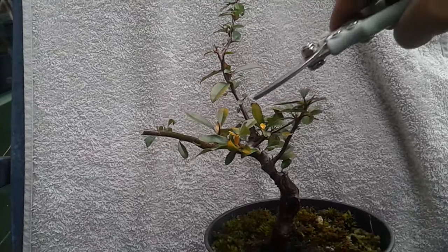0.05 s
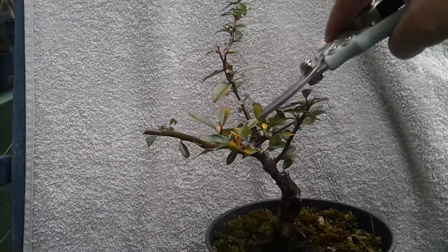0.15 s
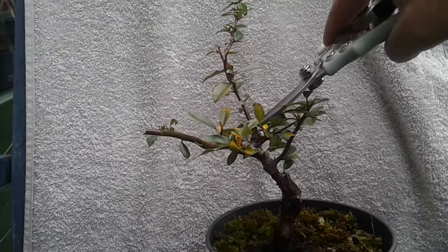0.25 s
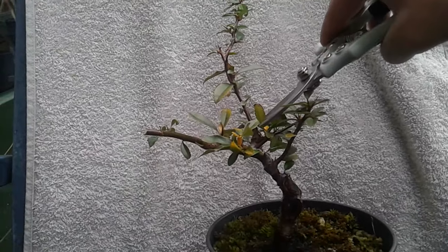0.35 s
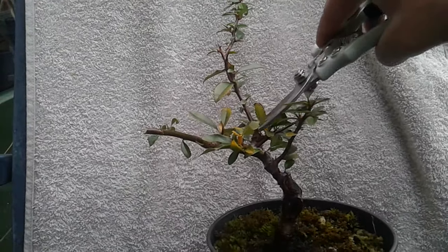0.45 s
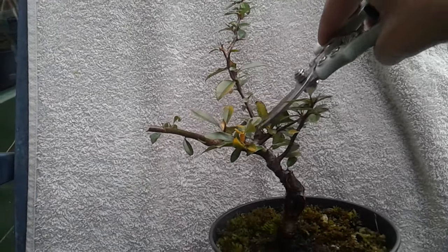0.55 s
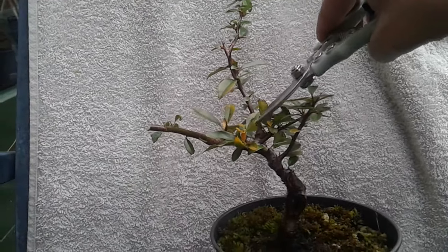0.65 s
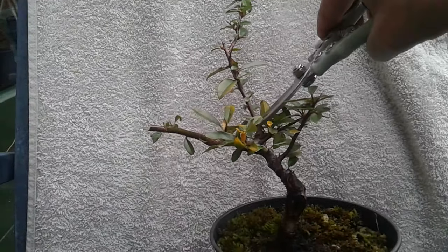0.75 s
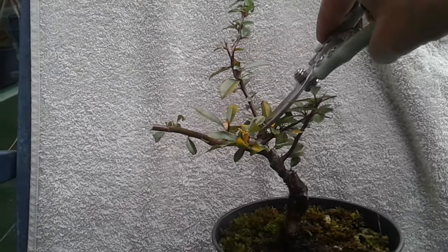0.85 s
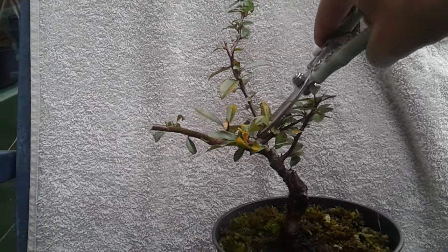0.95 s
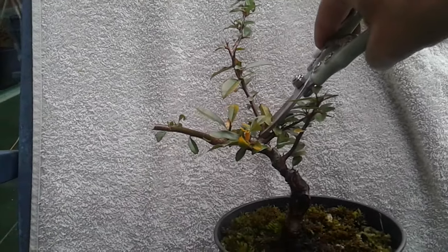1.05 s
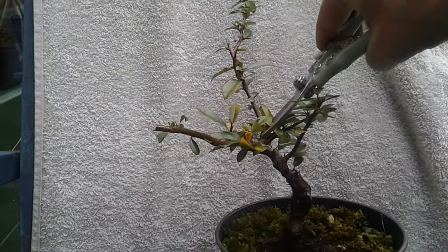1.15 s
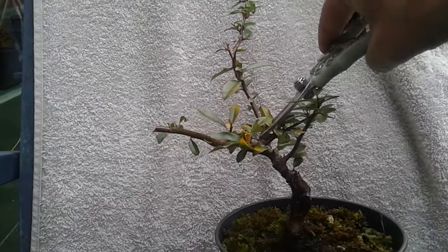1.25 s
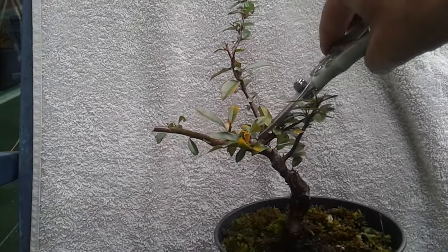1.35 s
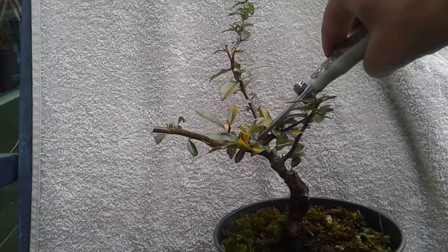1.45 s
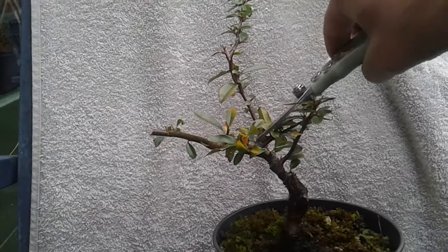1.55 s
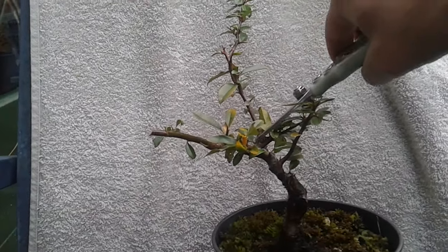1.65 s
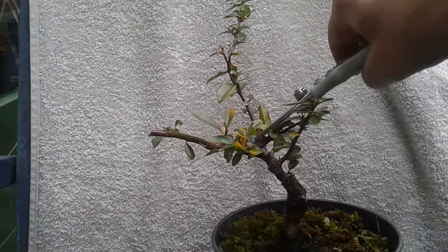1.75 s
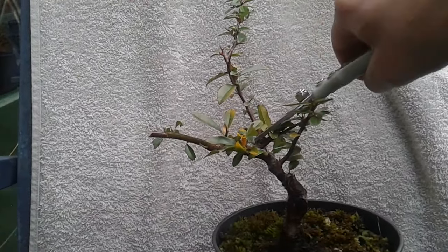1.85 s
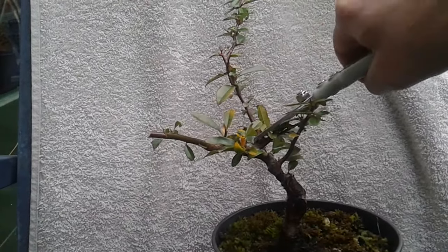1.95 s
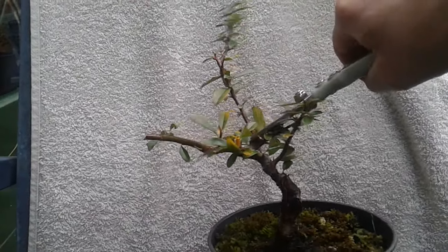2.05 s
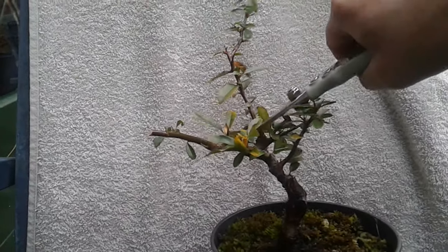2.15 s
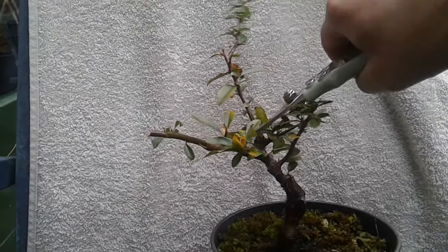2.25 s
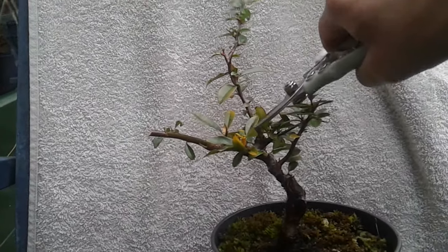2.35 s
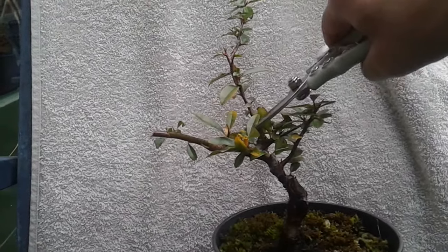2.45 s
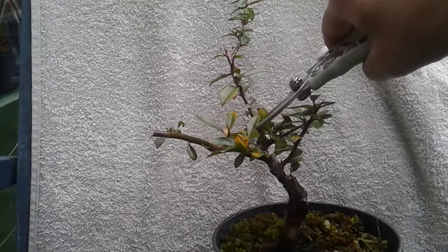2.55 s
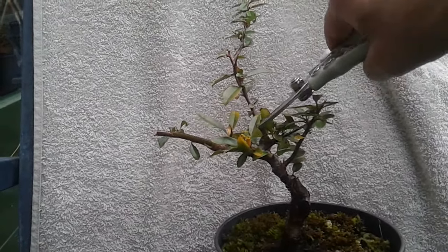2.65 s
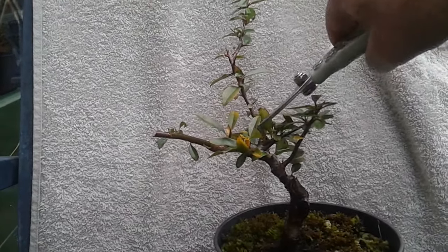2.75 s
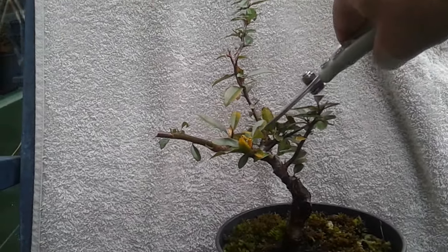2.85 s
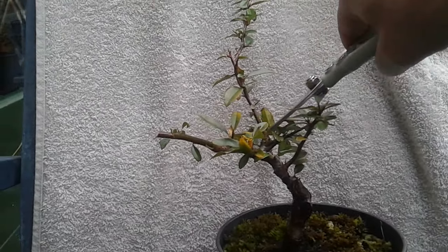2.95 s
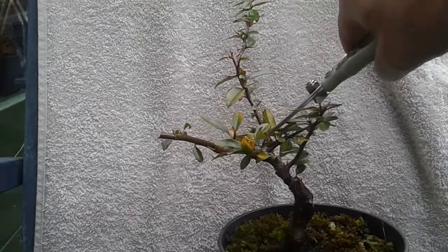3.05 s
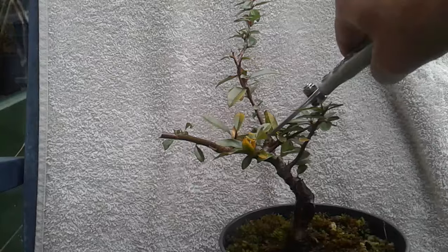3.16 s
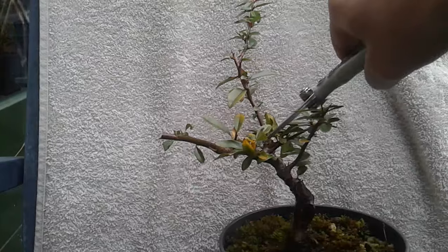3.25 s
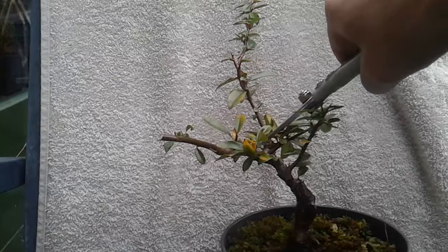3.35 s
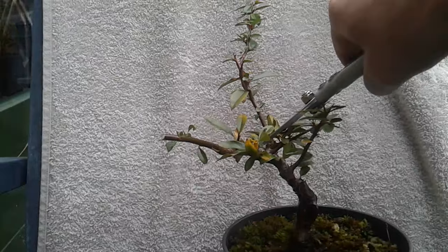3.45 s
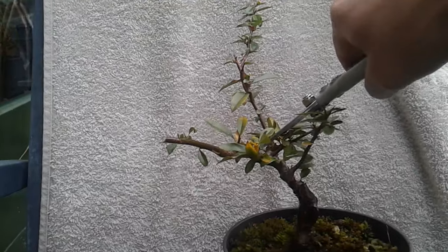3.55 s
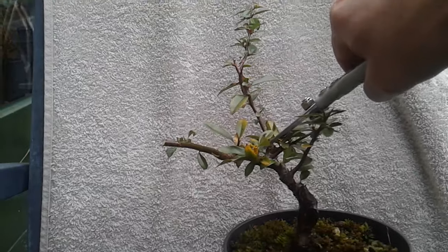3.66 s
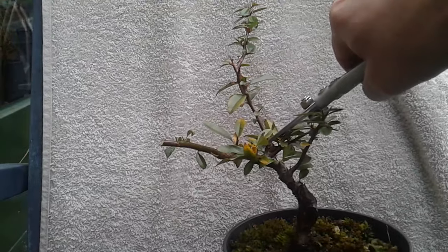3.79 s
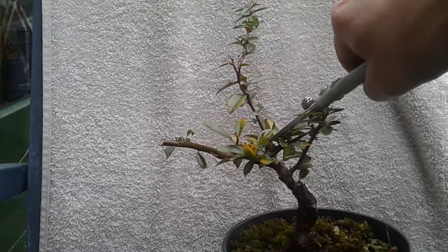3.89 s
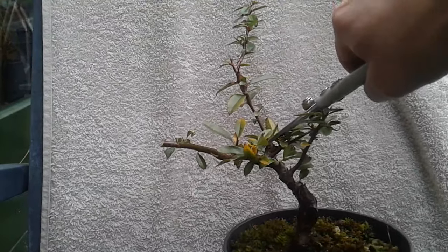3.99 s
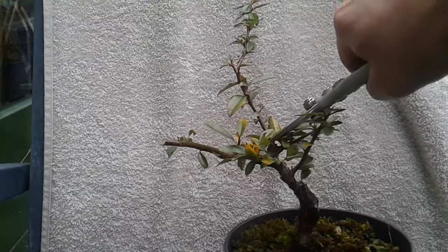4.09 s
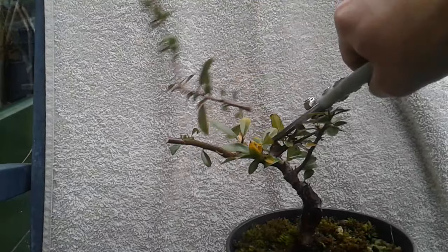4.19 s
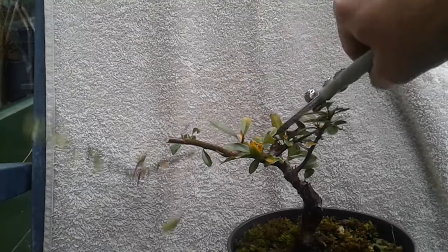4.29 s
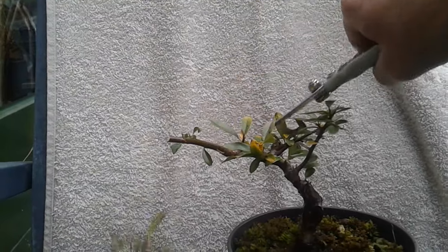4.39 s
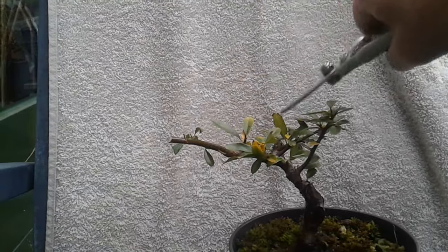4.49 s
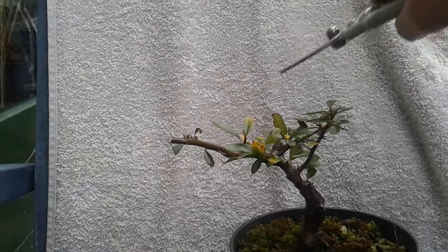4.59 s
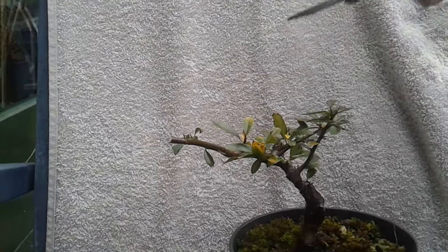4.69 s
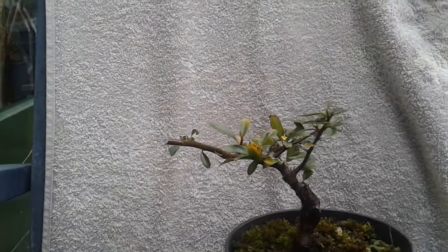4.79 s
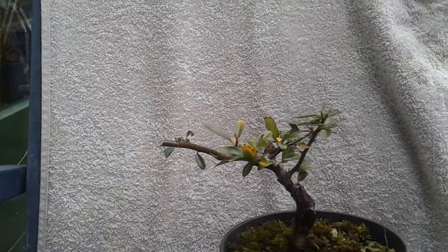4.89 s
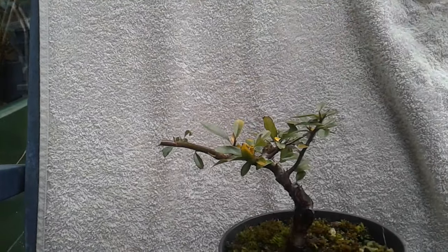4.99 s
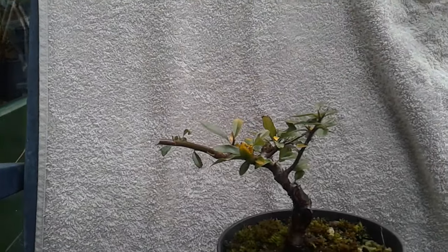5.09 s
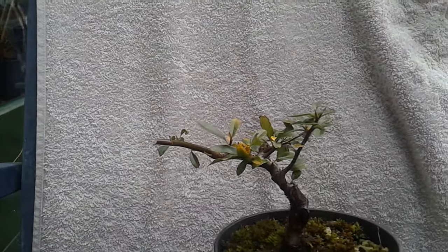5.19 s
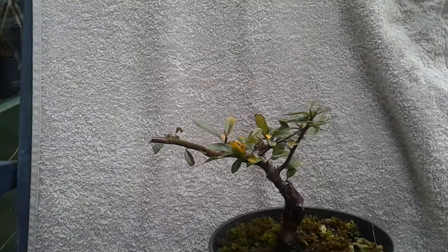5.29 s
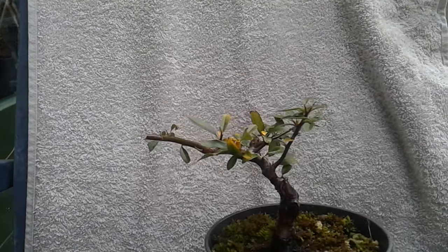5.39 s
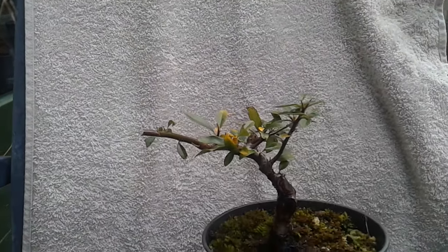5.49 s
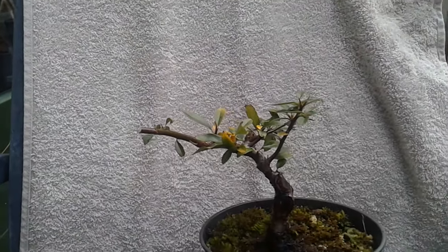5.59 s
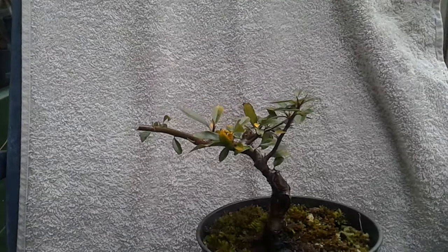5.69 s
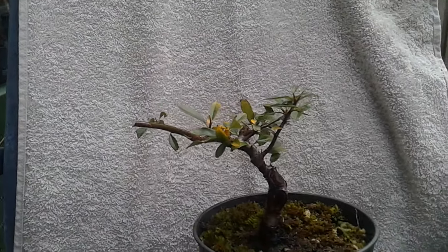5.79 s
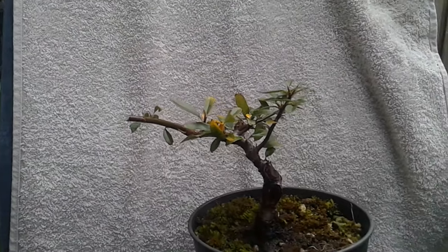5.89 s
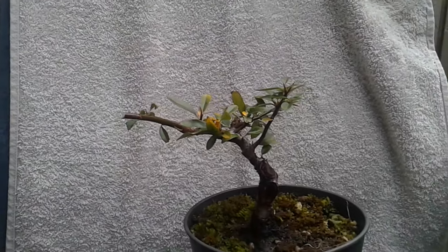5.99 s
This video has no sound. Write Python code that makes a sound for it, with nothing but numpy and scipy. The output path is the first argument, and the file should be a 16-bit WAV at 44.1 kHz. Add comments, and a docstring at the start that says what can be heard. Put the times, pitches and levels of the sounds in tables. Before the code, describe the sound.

Small pruning shears work through the leaves of a potted shrub, close to the microphone. From the start to about 1 second, steel rubs over leaves and twigs in short, scratchy strokes with several crisp, dry clicks. The rustling turns softer and sparser until about 2 seconds, with light ticks. It picks up again in uneven strokes, with a faint knock through the trunk and pot near 2.2 seconds and brighter clicks around 3.1 and 3.8 seconds. At about 4.1 seconds the blades snap shut through a shoot in one sharp metallic snip. The shoot brushes down through the leaves with a few clicks, the blades tick faintly near 4.5 seconds, and it lands softly around 4.6 seconds. A faint low outdoor rumble, a distant wash and a thin hiss lie beneath throughout, and carry on alone until about 6 seconds.

```python
"""Short rubbing strokes of pruning shears in the leaves of a potted shrub, close to a small microphone.
Steel slips over leaf and twig; leaf edges and thorns flick free with dry clicks. Then the blades snap
shut through a shoot, which brushes down and lands. Jolts ring the trunk and pot.
A low outdoor rumble, a distant wash and the recorder's hiss lie beneath."""
import sys
import numpy as np
from scipy import signal
from scipy.io import wavfile
from scipy.ndimage import uniform_filter1d

SR = 44100
rng = np.random.default_rng(int(sys.argv[2]) if len(sys.argv) > 2 else 0)


def inscribe(sig):
    """Save sig as 16-bit PCM at rate SR to the path in sys.argv[1].

    A 1-D sig is mono; a 2-D sig holds one channel per row.
    Samples are clipped to [-1, 1] before scaling.
    """
    pcm = np.round(np.clip(np.atleast_2d(sig).T, -1, 1) * 32767)
    wavfile.write(sys.argv[1], SR, pcm.astype(np.int16))


N = 266136

# Steel on leaves. Each row: peak time, rise and fall in seconds, peak in dB, treble over body in dB.
LEAF_STROKES = [(0.075, 0.063, 0.052, -66, 4), (0.164, 0.063, 0.22, -37.5, 0),
                (0.231, 0.071, 0.069, -36.5, 6.5), (0.324, 0.057, 0.045, -33.5, 3.5),
                (0.387, 0.21, 0.12, -34, 0.5), (0.502, 0.076, 0.035, -40, -2),
                (0.59, 0.048, 0.043, -38.5, 2.5), (0.697, 0.03, 0.054, -37.5, 0),
                (0.747, 0.11, 0.052, -36, 1), (0.871, 0.066, 0.086, -40.7, 1.2),
                (0.912, 0.05, 0.037, -39.5, 0.5), (0.987, 0.027, 0.049, -57, 2),
                (1.026, 0.039, 0.068, -65.5, 14), (1.082, 0.033, 0.073, -52, 1.3),
                (1.14, 0.016, 0.11, -62.5, 12), (1.171, 0.013, 0.026, -58.5, -8),
                (1.23, 0.296, 0.12, -72, 3), (1.382, 0.033, 0.043, -62, -7), (1.5, 0.078, 0.059, -49.5, 0),
                (1.536, 0.019, 0.05, -41, -2), (1.664, 0.061, 0.051, -45.5, -1),
                (1.725, 0.028, 0.051, -49.8, -3.5), (1.879, 0.082, 0.065, -45.5, -1),
                (1.93, 0.04, 0.063, -59.5, 2), (1.986, 0.03, 0.064, -62, -1),
                (2.099, 0.061, 0.043, -47.5, 4.5), (2.12, 0.023, 0.014, -43, 15),
                (2.175, 0.045, 0.014, -43, 1.5), (2.233, 0.056, 0.021, -44.5, -1),
                (2.293, 0.061, 0.032, -44.5, 0.5), (2.359, 0.028, 0.07, -39, 11),
                (2.39, 0.038, 0.055, -37, 1), (2.483, 0.12, 0.037, -41.5, 0.6),
                (2.532, 0.028, 0.055, -38.5, 2), (2.652, 0.049, 0.032, -48.5, 1),
                (2.743, 0.056, 0.23, -46.5, 0.5), (2.786, 0.037, 0.065, -42, 4),
                (2.823, 0.031, 0.034, -32.5, 8.5), (2.874, 0.106, 0.052, -44, -2.3),
                (2.943, 0.028, 0.062, -42.5, -0.5), (3.01, 0.034, 0.047, -34, 1.3),
                (3.043, 0.014, 0.038, -37.5, 2.1), (3.127, 0.018, 0.029, -44.8, 3),
                (3.195, 0.05, 0.032, -45.7, 4.5), (3.255, 0.043, 0.049, -38.5, 4.5),
                (3.314, 0.252, 0.061, -50.5, 1), (3.426, 0.045, 0.051, -50, 2.5),
                (3.524, 0.047, 0.036, -53.5, 0), (3.584, 0.03, 0.072, -48.5, 2),
                (3.685, 0.052, 0.058, -44.0, 0), (3.744, 0.072, 0.012, -47.5, -1.4),
                (3.777, 0.039, 0.034, -34.5, 3.5), (3.864, 0.101, 0.021, -58, 1),
                (3.894, 0.043, 0.049, -49, 1), (4.028, 0.096, 0.035, -58.5, 2),
                (4.102, 0.043, 0.022, -58.5, 1), (4.128, 0.0097, 0.018, -40.5, -2),
                (4.15, 0.051, 0.089, -51, 10), (4.196, 0.035, 0.014, -35, 5.5),
                (4.237, 0.022, 0.023, -37.5, 2), (4.301, 0.031, 0.075, -41, 1), (4.33, 0.017, 0.04, -42, 2),
                (4.401, 0.3, 0.26, -65, 4), (4.481, 0.079, 0.058, -61.5, 11), (4.62, 0.012, 0.058, -65, 5)]


def strokes():
    """Rub level and dryness in dB. Each stroke is a lopsided bell; the loudest dominates the dryness."""
    edge_db = -20  # one rise before the peak, one fall after
    t = np.arange(0, N / SR + .01, .002)
    power, dry_sum = 1e-11, 0
    for peak_s, rise_s, fall_s, peak_db, dry_db in LEAF_STROKES:
        away = (t - peak_s) / np.where(t < peak_s, rise_s, fall_s)
        stroke_power = gain_of(peak_db + edge_db * away ** 2) ** 2
        power += stroke_power
        dry_sum += stroke_power * dry_db
    return [np.interp(np.arange(N) / SR, t, curve) for curve in (10 * np.log10(power), dry_sum / power)]


# Leaf rub spectrum. Each row: frequency in Hz, relative density in dB.
LEAF_SPECTRUM = [(590, -38.5), (1000, -6), (2190, -0.5), (2550, -1.5), (2830, -2.5), (5270, -1.5),
                 (6650, -2.5), (7720, -10.5), (14900, -27.5), (15800, -23.5)]
# Twig scrape spectrum. Each row: frequency in Hz, relative density in dB.
TWIG_SPECTRUM = [(29, -41.5), (50, -13.5), (141, -3), (179, -5.5), (241, -2.5), (427, -2.5), (1800, -9),
                 (2340, -29), (3960, -120)]


def rub(level_db, dry_db):
    """Clumped slips excite leaf and twig over a fine, even drag; fast strokes blur the slips."""
    grit = gain_of(-2 - .2 * np.clip(level_db + 49.5, -15, 15))
    drift = unit_rms(uniform_filter1d(rng.standard_normal(N), size=150))
    clumps = gain_of(1.41 * np.minimum(grit, 1) * drift)
    grains = grit * unit_rms(slip_grains(per_s=1500, spread_db=4))
    drag = rng.standard_normal(N)
    slips = clumps * (grains + drag) / np.sqrt(1 + grit ** 2)
    scrape = .44 * unit_rms(slips) + rng.standard_normal(N)
    leaf = coloured(slips, LEAF_SPECTRUM)
    body = signal.filtfilt(*signal.butter(2, 4000, fs=SR), leaf)
    leaf = gain_of(-dry_db / 2) * body + gain_of(dry_db / 2) * (leaf - body)
    twig_db = -.5 - .4 * np.maximum(level_db + 60.5, 0)  # grows less than the leaf above the knee
    return gain_of(level_db) * (leaf + gain_of(twig_db) * coloured(scrape, TWIG_SPECTRUM))


def slip_grains(per_s, spread_db):
    """Tiny slips at random moments, a few large; most pull the air rather than push it."""
    size, polarity, chance = rng.random((3, N))
    height = gain_of(spread_db * np.minimum(-np.log(size + 1e-9), 4))
    return height * np.sign(polarity - .7) * (chance < per_s / SR)


# Leaf edges and thorns flicking free. Each row: time in seconds, click peak in dB, centre in Hz,
# crisp edge and low push in dB relative to the click.
CLEAR_FLICKS = [(0.0904, -42, 4800, -20, -22), (0.1126, -36, 4500, -21, -15), (0.1762, -25, 2630, -24, 0.5),
                (0.2636, -11.5, 5140, -7, -20), (0.2982, -15, 5300, -16, -19), (0.3192, -12, 5550, -7, -29),
                (0.538, -35, 4000, -18, -8), (0.5551, -31, 4560, -15, -13), (0.582, -32, 6474, -6, -30),
                (0.6, -22, 6530, -6, -30), (0.6099, -27, 5700, -4, -32), (0.627, -28, 5100, -20, -24),
                (0.6634, -34, 3700, -24, -26), (0.688, -10.5, 3146, -30, -12.5),
                (0.7075, -27, 5000, -14, -17), (0.8526, -22.5, 4000, -20, -10), (0.9114, -8, 6500, -4, -17),
                (0.927, -30, 3600, -4, -9), (0.9924, -33.5, 4670, -25, -18), (1.0402, -40, 5000, -13, -20),
                (1.0796, -31, 5300, -13, -30), (1.1105, -29, 4700, -14, -21),
                (1.1449, -20.5, 4600, -9, -15.5), (1.1722, -33, 4500, -17, -23),
                (1.2705, -45, 4750, -11, -23), (1.3748, -37.5, 3700, -20, -16),
                (1.3787, -34.5, 4400, -19, -26), (1.4003, -36.5, 4300, -22, -18),
                (1.455, -30, 4500, -17, -18), (1.4667, -37, 4500, -16, -18),
                (1.5024, -26.5, 5700, -22, -12), (1.5551, -25, 3800, -21, -15),
                (1.5592, -26, 4300, -20, -12), (1.5633, -28.5, 3350, -20, -10),
                (1.5711, -38, 3100, -23, -11), (1.5823, -37, 3500, -23, -6), (1.6119, -35, 4200, -13, -8),
                (1.6899, -28, 4270, -14, -22), (2.0451, -35, 5800, -18, -23), (2.087, -27, 4470, -6, -25),
                (2.105, -25, 5200, -8, -13), (2.1197, -33, 2470, -20, -4), (2.1303, -29, 4200, -22, -12),
                (2.149, -38, 7000, -8, -30), (2.1772, -24, 5700, -21, -25), (2.2748, -23.5, 6000, -8, -16),
                (2.3016, -30, 6500, -16, -32), (2.3176, -31, 6500, -31, -18), (2.3381, -39, 6500, -19, -20),
                (2.39, -21, 5600, -16, -27), (2.4904, -24, 5300, -21, -30), (2.5653, -22.5, 4500, -25, -11),
                (2.5785, -30, 5300, -23, -24), (2.6702, -34, 5900, -15, -30), (2.772, -22.5, 6100, 1, -16),
                (3.0488, -20, 5000, -23, -25), (3.0575, -13, 5440, -33, -23), (3.082, -31, 4000, -24, -18),
                (3.1249, -20, 4300, -20, -15), (3.1303, -14.5, 2060, -16, -10.5),
                (3.221, -24, 5900, -5, -23), (3.3034, -27, 2980, -21, -4.5), (3.3234, -25.5, 4600, -9, -19),
                (3.4349, -38.5, 1700, -25, 4.5), (3.5201, -35, 4200, -28, -30), (3.541, -32, 5400, -3, -20),
                (3.6591, -25.5, 5040, -1, -12), (3.74, -23.5, 5400, -17, -28),
                (3.7667, -16.5, 5150, -11, -22), (3.7807, -13.5, 4650, -22, -15),
                (3.8043, -23, 4400, -20, -19), (3.8899, -34, 5000, -7, -31), (4.223, -25, 4500, -4, -18),
                (4.3036, -29.5, 2270, -22, 0.5), (4.3505, -18, 4800, -26, -13.5)]


def flicks(level_db):
    """Each flick is a sudden pull of air and its rebound, ringing briefly in the microphone port."""
    out, snap = np.zeros(N), -signal.unit_impulse(400)
    edge = unit_peak(passed(snap, 9000, "high"))
    push = unit_peak(passed(snap, [250, 1500], "band"))
    for time_s, peak_db, hz, edge_db, push_db in CLEAR_FLICKS + small_flicks(level_db):
        pull = signal.lfilter(*signal.iirpeak(hz, Q=1.1, fs=SR), snap)
        click = unit_peak(.2 * pull + ring(pull, hz=6140, width_hz=3700))
        flick = click + gain_of(edge_db) * edge + gain_of(push_db) * push
        add(out, time_s - abs(click).argmax() / SR, gain_of(peak_db) * flick)
    return out


def small_flicks(level_db, count=90, over_rub_db=13.5, scatter_db=5.5):
    """Rows for lesser flicks at random moments, each riding above the rub until hard strokes drown it."""
    when, size, centre, crisp = rng.random((count, 4)).T
    time_s = np.interp(when, (0, 1), (.08, 4.1))
    hz = np.interp(centre, (0, 1), (3170, 6100))
    mean_db = np.minimum(level_db[(time_s * SR).astype(int)] + over_rub_db, -28)
    peak_db = mean_db + scatter_db * (2 * size - 1)
    edge_db = np.interp(crisp, (0, 1), (-22, -8))
    push_db = -9 - 4 * np.log2(hz / 4000)  # duller flicks push more
    return list(zip(time_s, peak_db, hz, edge_db, push_db))


# Hand-damped steel modes. Each row: frequency in Hz, width in Hz, relative level in dB.
STEEL_MODES = [(960, 200, 1), (1610, 180, -8), (1980, 300, -9.5), (3380, 400, 3), (4610, 400, 0),
               (5370, 700, 0.5), (6490, 400, -2.5), (7860, 400, 0), (8900, 400, -4), (9950, 400, -8),
               (10900, 490, -5), (12300, 800, -6), (14700, 700, -8.5)]
# Steel meeting stem or steel. Each row: start in seconds, strength in dB, contact pitch in Hz,
# chatter decay in seconds.
BLADE_BLOWS = [(4.1240, -16.5, 4280, .0012), (4.1258, -12.5, 4500, 0.00082), (4.1274, -16, 11100, .0012),
               (4.1289, -19.5, 6000, .0012), (4.129, -25, 6500, 0.011), (4.4674, -40, 5500, 0.0014),
               (4.4681, -34, 5560, 0.0016), (4.475, -38, 5000, 0.0017), (4.479, -40.5, 4970, .004),
               (4.507, -49, 5000, 0.0039)]


def blades():
    """Each blow and the chatter after it ring the steel modes around its contact pitch."""
    out, t = np.zeros(N), np.arange(1500) / SR
    for start_s, strength_db, contact_hz, decay_s in BLADE_BLOWS:
        chatter = rng.standard_normal(len(t)) * np.exp(-t / decay_s)
        blow = .89 * signal.unit_impulse(len(t)) + chatter
        steel = np.zeros(len(t))
        for k, (hz, width_hz, db) in enumerate(STEEL_MODES):
            weight = gain_of(db - 12 * np.log2(hz / contact_hz) ** 2) * np.sqrt(width_hz)
            steel += (-1) ** k * weight * ring(blow, hz, width_hz)
        steel /= np.sqrt(np.sum(steel ** 2) / (SR * .0011))  # energy of 1.1 ms at rms 1
        add(out, start_s, gain_of(strength_db) * steel)
    return out


# Trunk and pot modes. Each row: frequency in Hz, width in Hz, relative level in dB.
POT_MODES = [(48, 30, -0.5), (89, 40, -1), (170.1, 70, 8), (247.6, 24, -1), (408, 80, 0.5), (582, 80.8, -9),
             (980, 130, -0.5), (1400, 670, -4), (2240, 680, 4)]
# Jolts down the trunk, and the cut shoot landing from 4.62 s on. Each row: start in seconds, peak in dB,
# contact pitch in Hz.
JOLTS = [(2.157, -37, 490), (2.1685, -33.5, 350), (2.179, -33.5, 250), (4.1236, -32.5, 169),
         (4.1267, -34.5, 801), (4.1338, -39.5, 70), (4.166, -35, 200), (4.224, -29.5, 1030),
         (4.468, -40, 1400), (4.6203, -45.5, 1230), (4.624, -47.5, 361), (4.653, -54, 886)]


def pot():
    """Each jolt, with a brief scuffle after it, rings trunk and pot near its contact pitch."""
    out, t = np.zeros(N), np.arange(4000) / SR
    for start_s, peak_db, contact_hz in JOLTS:
        scuffle = .09 * rng.standard_normal(len(t)) * np.exp(-t / .005)
        jolt = signal.unit_impulse(len(t)) + scuffle
        body = np.zeros(len(t))
        for k, (hz, width_hz, db) in enumerate(POT_MODES):
            weight = gain_of(db - 8.4 * np.log2(hz / contact_hz) ** 2)
            body += (-1) ** k * weight * ring(jolt, hz, width_hz)
        add(out, start_s, gain_of(peak_db) * unit_peak(body))
    return out


# Outdoor rumble spectrum. Each row: frequency in Hz, relative density in dB.
RUMBLE_SPECTRUM = [(15, -40), (25, -19), (50, -8.5), (85, -2), (125, -9.5), (200, -21.5), (400, -44),
                   (800, -89.5)]
# Gust envelope. Each row: time in seconds, level in dB.
GUSTS = [(0.0, -65.5), (0.3, -58), (1.44, -75), (2.05, -64), (2.25, -59), (2.54, -70), (4.06, -64.5),
         (4.33, -56), (4.7, -69.5), (5.2, -66.5), (5.56, -62), (6.03, -70.5)]


def rumble(level_db):
    """Low noise that swells with gusts and with handling, which partly follows the rub."""
    gusts = gain_of(np.interp(np.arange(N) / SR, *np.transpose(GUSTS)))
    handling = gain_of(-64.5 + .35 * (uniform_filter1d(level_db, size=4000) + 39))
    return np.hypot(gusts, handling) * coloured(rng.standard_normal(N), RUMBLE_SPECTRUM)


# Distant wash spectrum. Each row: frequency in Hz, relative density in dB.
WASH_SPECTRUM = [(90, -29), (150, -4.5), (250, -3), (500, -10), (1000, -10), (1500, -16.5), (3500, -19),
                 (6000, -19), (8500, -22.5), (13000, -44.5)]


def wash(rms_db=-73):
    """Steady, faint noise from far off."""
    return gain_of(rms_db) * coloured(rng.standard_normal(N), WASH_SPECTRUM)


# Recorder hiss spectrum. Each row: frequency in Hz, relative density in dB.
HISS_SPECTRUM = [(18, -45.5), (30, -17), (183, -0.5), (335, -3), (2730, -9.5), (15800, -1.5)]


def hiss(dry, floor_db=-70.5):
    """Each channel's own hiss, rising somewhat with the loudness above the bass."""
    noise = np.array([coloured(white, HISS_SPECTRUM) for white in rng.standard_normal(dry.shape)])
    power = uniform_filter1d(passed(dry[0], 300, "high") ** 2, size=9000)
    loudness_db = 10 * np.log10(abs(power) + 1e-9)
    return gain_of(floor_db + .23 * np.clip(loudness_db + 82.5, 0, 20)) * noise


def gain_of(db):
    """dB to gain."""
    return 10 ** (np.asarray(db) / 20)


def unit_rms(x):
    """Scales to rms 1."""
    return x / np.sqrt(np.mean(x ** 2) + 1e-20)


def unit_peak(x):
    """Scales to peak 1."""
    return x / abs(x).max()


def add(mix, start_s, sound):
    """Mixes a sound in at start_s."""
    part = mix[round(start_s * SR):][:len(sound)]
    part += sound[:len(part)]


def coloured(x, spectrum):
    """Minimum-phase filter with the given spectrum; output rms 1."""
    hz, db = np.transpose(spectrum)
    bins_hz = abs(np.fft.fftfreq(8192, 1 / SR))
    log_gain = np.log(gain_of(np.interp(np.log(bins_hz + 1), np.log(hz + 1), db)))
    response = np.exp(np.conj(signal.hilbert(log_gain)))
    taps = np.fft.ifft(response).real[:4096]
    return unit_rms(signal.oaconvolve(x, taps)[:len(x)])


def ring(x, hz, width_hz):
    """One damped mode struck by x."""
    pole = np.exp((-np.pi * width_hz + 2j * np.pi * hz) / SR)
    return signal.lfilter([1], [1, -pole], x).imag


def passed(x, hz, kind):
    """Butterworth low-, high- or band-pass."""
    return signal.sosfilt(signal.butter(2, hz, kind, fs=SR, output="sos"), x)


def scene():
    """All sources reach both channels alike."""
    level_db, dry_db = strokes()
    pruning = rub(level_db, dry_db) + flicks(level_db) + blades() + pot()
    return np.tile(pruning + rumble(level_db) + wash(), (2, 1))


def record(dry):
    """Adds hiss, then limits the band to 15.8 kHz."""
    lowpass = signal.firwin(511, 15800, window=("kaiser", 9), fs=SR)
    return signal.oaconvolve(dry + hiss(dry), lowpass[None], "same")


dry = scene()
out = record(dry)
inscribe(out)
```